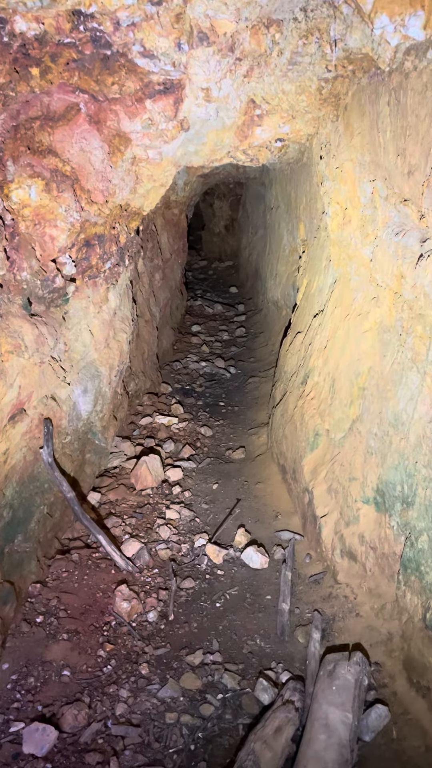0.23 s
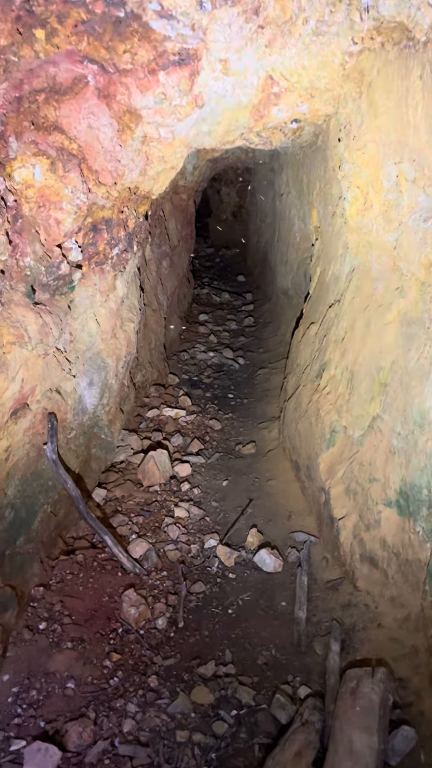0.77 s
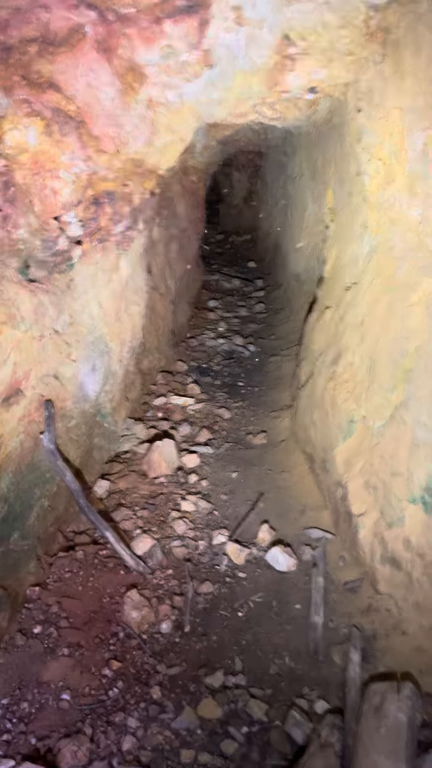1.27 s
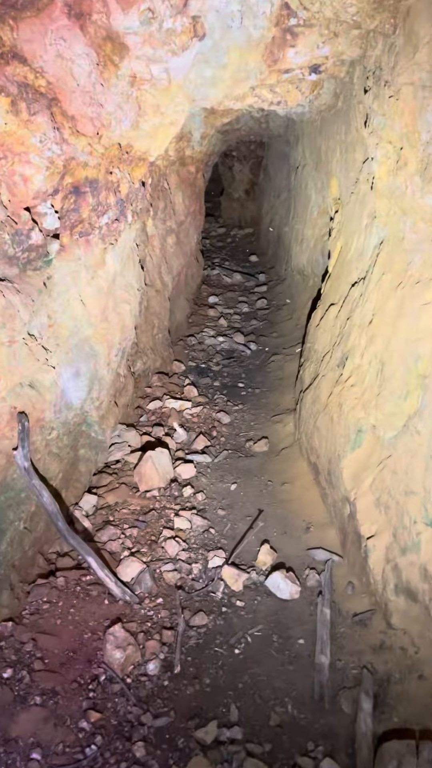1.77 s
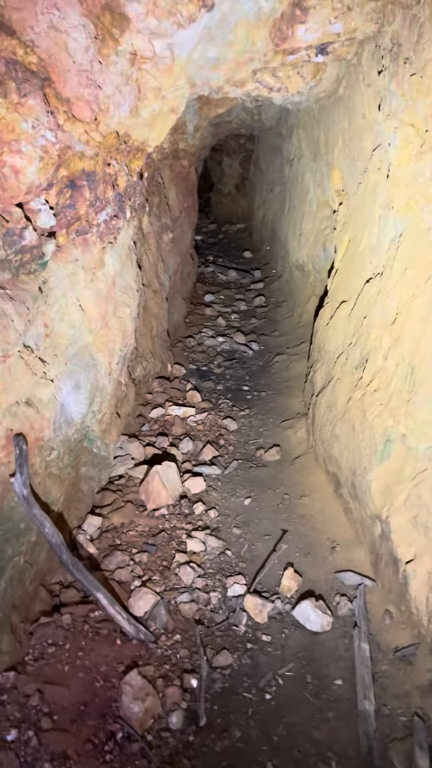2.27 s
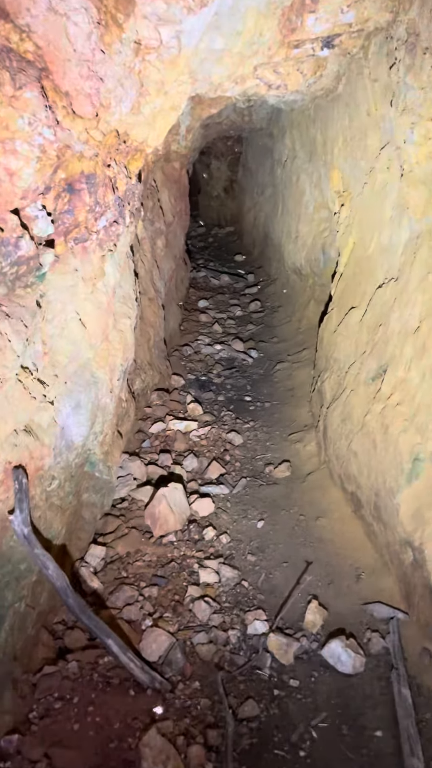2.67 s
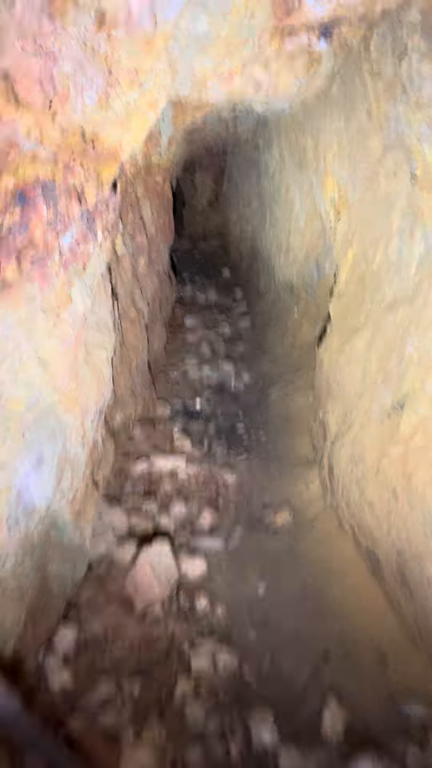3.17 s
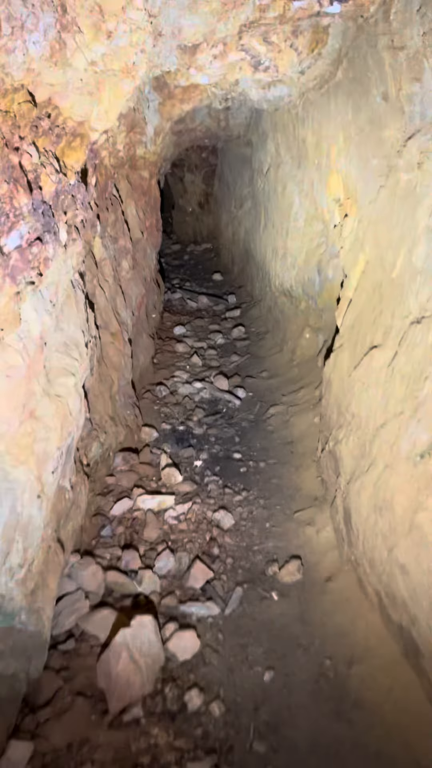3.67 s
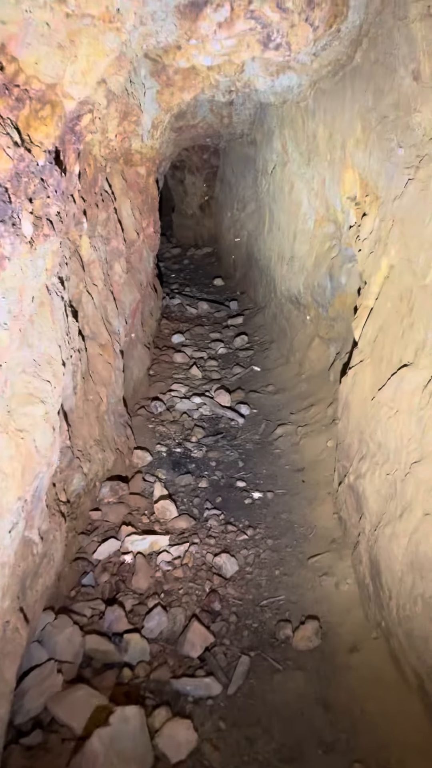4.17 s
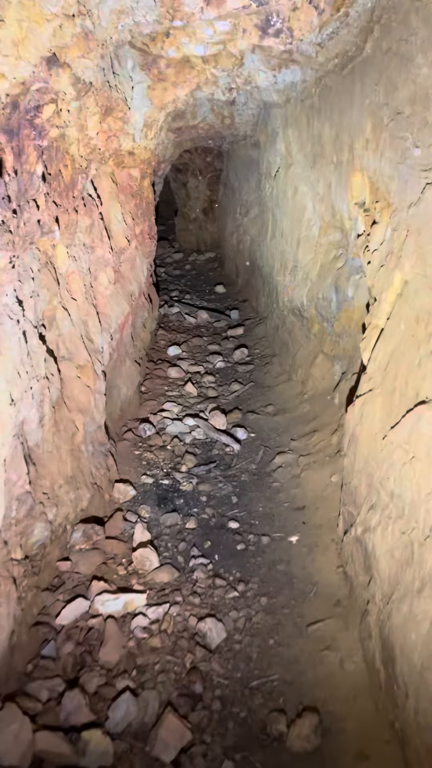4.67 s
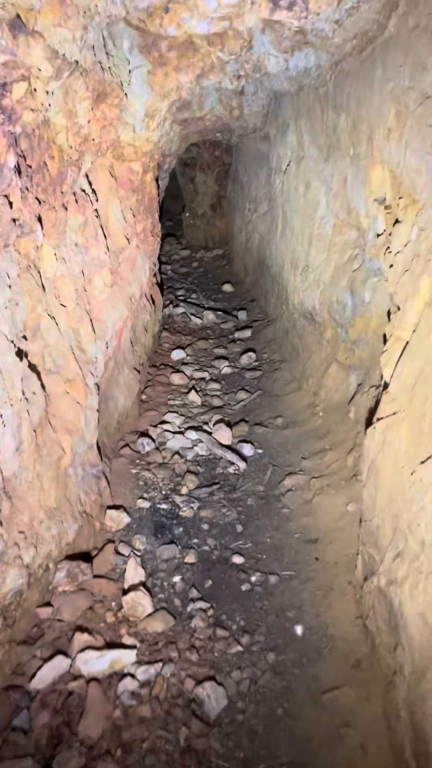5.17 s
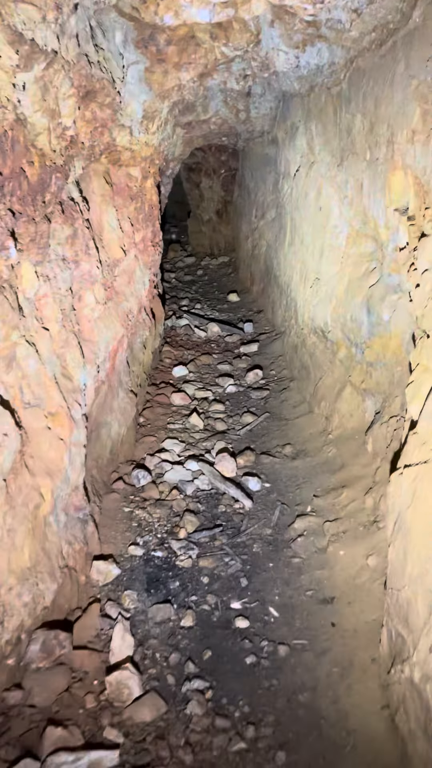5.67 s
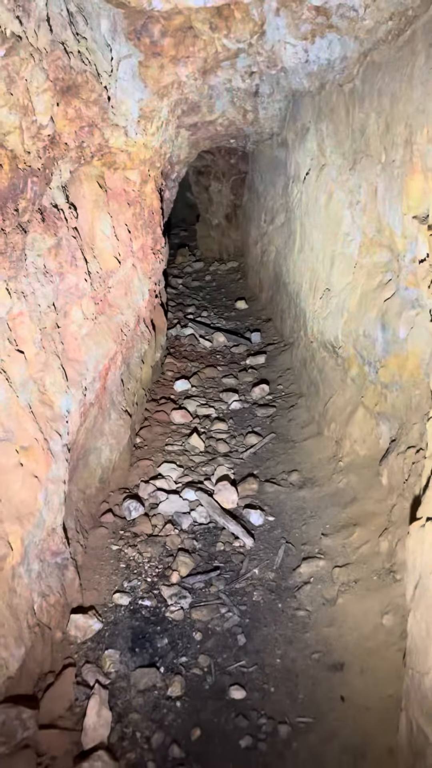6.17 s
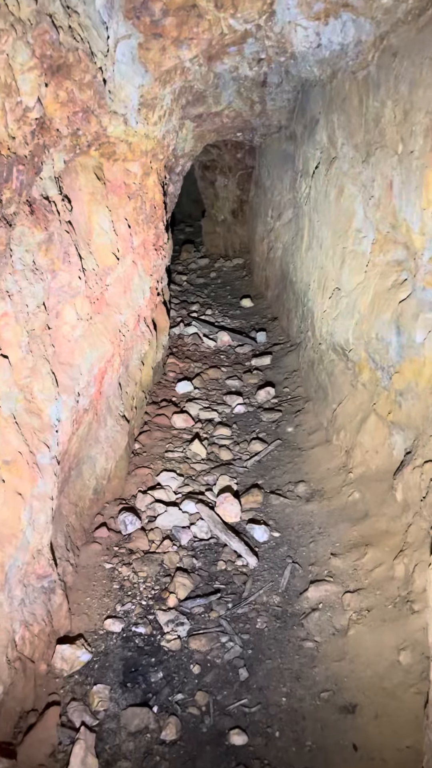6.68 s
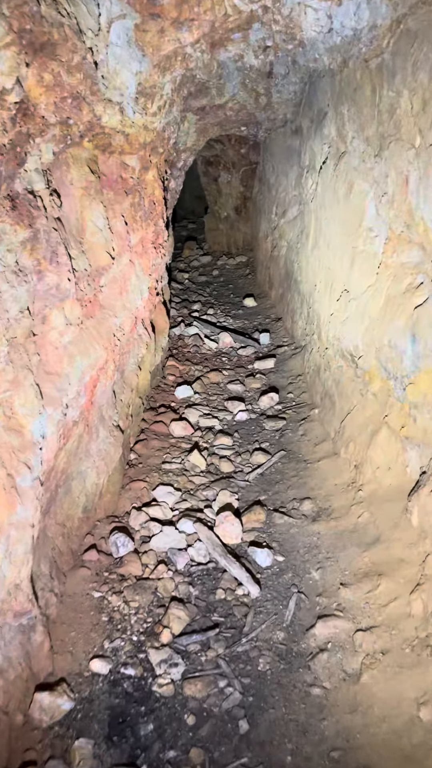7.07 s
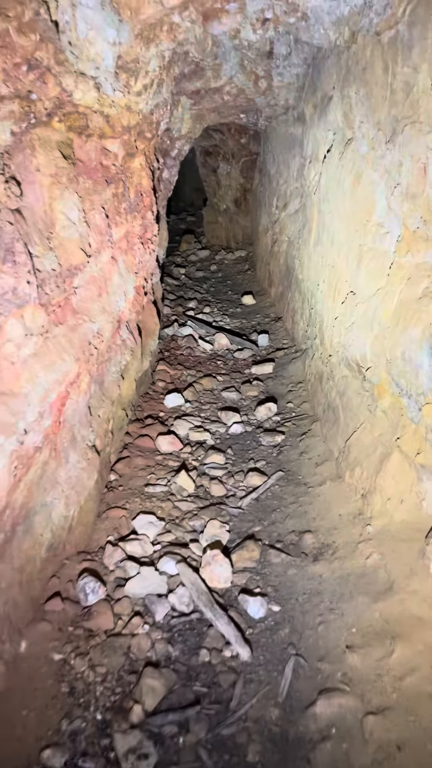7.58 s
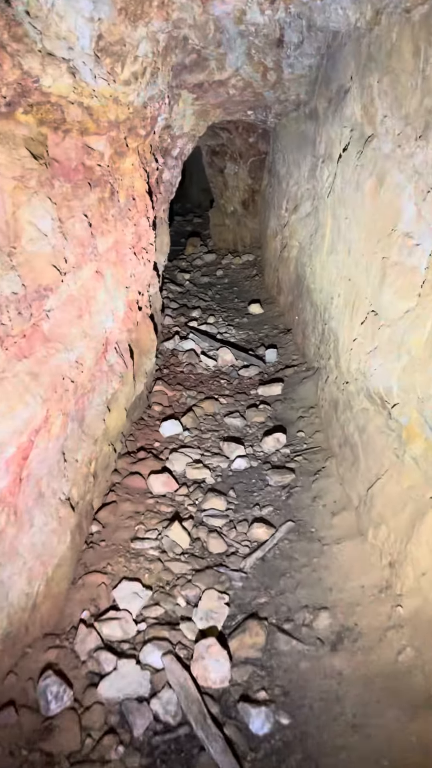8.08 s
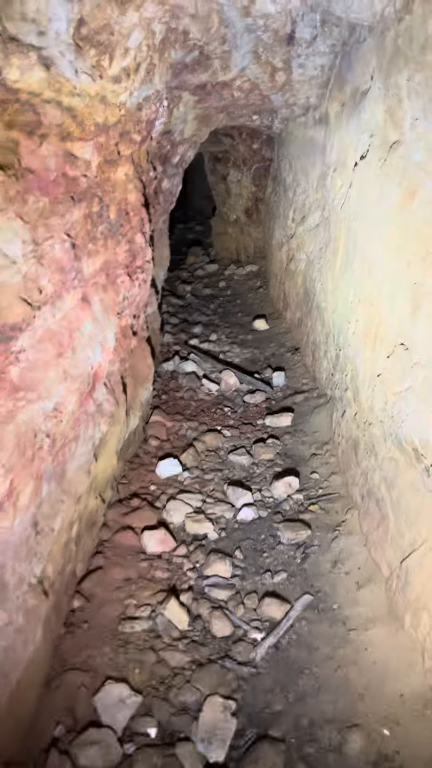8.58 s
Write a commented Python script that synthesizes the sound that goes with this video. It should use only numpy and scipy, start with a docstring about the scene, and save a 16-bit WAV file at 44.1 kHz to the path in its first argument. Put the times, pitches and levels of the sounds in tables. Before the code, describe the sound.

Someone walks slowly over rubble underground, soles scuffing grit, rocks tipping and cracking, close walls adding short boomy echoes over faint hush.

```python
"""A narrow tunnel floored with loose rock: someone walks through it with uneven steps, close to a two-port microphone.
Each boot is a burst of noise tuned to a thud, with a harder slap and an 82 Hz thump; scuffs are clouds of tiny rings.
Big rocks clunk on one low note and a weak overtone, small stones crack and ring in two modes, hollow echoes sink in pitch.
Random echoes from close walls thicken each contact, and low resonances boom over rumble and a faint steady hush."""
import sys
import numpy as np
from scipy import signal
from scipy.fft import rfft, irfft, next_fast_len
from scipy.io import wavfile
from scipy.ndimage import uniform_filter1d

SR = 44100
rng = np.random.default_rng(int(sys.argv[2]) if len(sys.argv) > 2 else 0)


def digitize_waveform(pressure):
    """Quantize a signal to 16-bit integers and store it at the path in sys.argv[1].

    Rows of a 2-D input are taken as channels; values are limited to [-1, 1].
    """
    field = np.atleast_2d(pressure).T
    bounded = np.clip(field, -1, 1)
    quanta = np.round(bounded * 32767).astype(np.int16)
    wavfile.write(sys.argv[1], SR, quanta)


N = 389844

# boots landing and taking weight; thump and slap are set relative to the level of the landing:
# start_s, level_db, thump_db, slap_db, pitch_hz
LANDINGS = [(0.376, -41, -13, -18, 270), (0.571, -43.5, -16, -2, 336), (0.664, -40, -3, -8, 310),
            (1.118, -39, 4.5, -22, 260), (1.142, -38, -10, -3, 480), (1.204, -26.5, -8, -8, 271.6),
            (1.227, -28, -8, -13, 200), (1.293, -39, -3, -6, 480), (1.504, -38, -1, -30, 257),
            (1.948, -47.5, 9, 0, 273), (1.973, -42, 4, -16, 230), (2.194, -48, -17, 0, 345),
            (2.512, -47, -3, -22, 260), (3.063, -32, -22, -5, 320), (3.094, -26, -9, -7, 230),
            (3.117, -26.5, -2.5, -14, 219), (3.232, -40, 3, -16, 140), (3.698, -39, -2, -17, 383),
            (3.762, -22, -13, -1.5, 382), (4.284, -44, -19, 4, 407), (4.377, -40, -1, -18, 260),
            (4.496, -39, -16, -6.5, 383), (4.84, -42, -6, -8, 322), (4.909, -35, -6, -6, 286),
            (4.939, -32, -6, -14, 312), (5.151, -32, -10, -2, 310), (5.443, -42.5, -6, -0.5, 288),
            (5.702, -31.5, -1, -3, 455), (5.774, -36, 3, -24, 175), (6.235, -42, 2, -5, 318),
            (6.865, -45, -7, -16, 280), (6.922, -44, -12, -18, 270), (7.519, -38.5, 8.5, 1.5, 438),
            (7.628, -39, 5, -15, 290), (8.23, -38, 0, -12, 300), (8.31, -42, -11, -6, 272),
            (8.369, -40, -8, -20, 275)]
# treble of cracking stone edges and breaking chips: frequency_hz, gain_db
EDGE_SPECTRUM = [(3000, -40), (5500, -6), (7000, 1), (8800, 7.5), (10300, 2), (12500, 1), (15500, -17)]


def amp(db):
    """Decibels to gain."""
    return 10 ** (np.asarray(db) / 20)


def unit(x):
    """x at rms 1."""
    return x / np.sqrt(np.mean(x ** 2) + 1e-20)


def crest(pair):
    """A mid-side pair scaled so that the loudest 5 ms of its mid have rms 1."""
    return pair / np.sqrt(uniform_filter1d(pair[0] ** 2, size=220).max())


def along(points, hz):
    """Values at hz from (frequency, value) points, interpolated on a log axis."""
    f, v = np.transpose(points)
    return np.interp(np.log(hz + 1), np.log(f + 1), v)


def curve(points):
    """One value per sample from (time, value) points."""
    s, value = np.transpose(points)
    return np.interp(np.arange(N) / SR, s, value)


def filtered(x, response):
    """x times a complex response of frequency."""
    n = x.shape[-1]
    padded = next_fast_len(n + SR // 4)
    return irfft(rfft(x, padded) * response(np.fft.rfftfreq(padded, 1 / SR)), padded)[..., :n]


def coloured(x, spectrum, size=4096):
    """x through a causal minimum-phase filter with the given spectrum."""
    gain = amp(along(spectrum, np.fft.rfftfreq(size, 1 / SR)))
    cepstrum = irfft(np.log(gain))
    # folding the cepstrum forward in time makes the phase minimal
    cepstrum[1:size // 2] *= 2
    cepstrum[size // 2:] = 0
    kernel = irfft(np.exp(rfft(cepstrum)))
    kernel = kernel.reshape((1,) * (x.ndim - 1) + (size,))
    return signal.fftconvolve(x, kernel, axes=-1)[..., :x.shape[-1]]


def focused(x, hz, width, skirt_db):
    """x with a broad resonance at hz that falls to the skirt level within the relative width."""
    return coloured(x, [(hz / (1 + width), skirt_db), (hz, 0), (hz * (1 + width), skirt_db)])


def swells(events, size=44):
    """Gain per sample of overlapping (s, dB, rise s, fall s) swells; rise and fall each span 20 dB."""
    t = np.arange(0, N, size) / SR
    power = 0
    for s, db, rise, fall in events:
        slope = np.minimum((t - s) / rise, (s - t) / fall)
        power = power + amp(db + 20 * slope) ** 2
    return np.interp(np.arange(N) / SR, t, np.sqrt(power))


def add(track, s, sound):
    """Mix a sound into the track from time s on."""
    start = max(0, round(s * SR))
    part = sound[:, :max(0, N - start)]
    track[:, start:start + part.shape[1]] += part


def walls(sound, direct, near_t60, far_t60, far_db):
    """Mid and side of one spot: direct path in the middle, a rush of close-wall echoes, the tail down the tunnel."""
    t = np.arange(SR // 2) / SR
    decay = amp(-60 * t / near_t60) + amp(far_db - 60 * t / far_t60)
    echoes = rng.standard_normal((2, len(t))) * decay / np.linalg.norm(decay)
    echoes[0, 0] = direct
    return signal.oaconvolve(sound[None], echoes, axes=1)


def along_the_way(x, direct, near_t60, far_t60, far_db, size=4410):
    """Each tenth of a second gets wall echoes of its own, as the patch of ground shifts."""
    out = np.zeros((2, N))
    for start in range(0, N, size):
        patch = x[start:start + size]
        add(out, start / SR, walls(patch, direct, near_t60, far_t60, far_db))
    return out


def grains(rate, low_hz, high_hz, cycles, spread_db, size):
    """Tiny contacts at random, rate per second, each a ring of its own pitch and strength that decays over a few cycles."""
    when, pitch, strength = rng.random((int(rate * N / SR), 3)).T
    hz = low_hz * (high_hz / low_hz) ** pitch
    gain = hz * amp(-spread_db * np.log(np.maximum(strength, 1 / 100)))
    turns = hz[:, None] * np.arange(size) / SR
    rings = gain[:, None] * np.sin(2 * np.pi * turns) * np.exp(-turns / cycles)
    index = (when * N).astype(int)[:, None] + np.arange(size)
    return np.bincount(index.ravel(), rings.ravel(), N)[:N]


def boom():
    """Gain of the low rumble: a slow background level, plus a swell that peaks just after each thump and rolls away."""
    # background rumble: time_s, level_db
    background = [(0, -72), (0.4, -62.5), (2.9, -59), (4.1, -52), (4.7, -60.5), (5.4, -53), (6.6, -59.5),
                  (7, -51.5), (8.84, -52.5)]
    linger_db, rise_s, fall_s = -17.5, .15, .7  # level relative to the thump
    after = swells([(s + rise_s, db + thump_db + linger_db, rise_s, fall_s)
                    for s, db, thump_db, *_ in LANDINGS])
    return np.hypot(after, amp(curve(background)))


def tunnel_air(boom_db=-4, floor_db=-68):
    """Low rumble, shaped noise, rolls along the tunnel around the steps over a faint steady hush."""
    # low rumble: frequency_hz, gain_db
    rumble_spectrum = [(25, -32), (45, 1), (65, -4.5), (90, -11.5), (130, -7.5), (200, -23.5), (500, -71.5)]
    # hush of the air: frequency_hz, gain_db
    hush_spectrum = [(20, -11.5), (55, 7.5), (150, -12.5), (350, -7), (700, -16.5), (2000, -24),
                     (5000, -31.5), (10000, -35.5), (15000, -44)]
    rumble = unit(coloured(rng.standard_normal((2, N)), rumble_spectrum))
    hush = unit(coloured(rng.standard_normal((2, N)), hush_spectrum))
    return amp(boom_db) * boom() * rumble + amp(floor_db) * hush


def sinking_echoes(rough=.5, size=700):
    """The tunnel returns higher notes sooner than low ones, so its uneven answer slides down in pitch."""
    # hollow echoes after a landing: start_s, level_db
    answers = [(7.535, -46.5), (7.63, -43), (8.24, -50), (8.45, -52.5)]
    start_hz, end_hz, sink_s, rise_s, t60_s = 495, 295, .065, .015, .45  # sink and rise are time constants
    out, t = np.zeros((2, N)), np.arange(SR // 2) / SR
    hz = end_hz + (start_hz - end_hz) * np.exp(-t / sink_s)
    phase = 2 * np.pi * np.cumsum(hz) / SR
    swell = (1 - np.exp(-t / rise_s)) * amp(-60 * t / t60_s)
    for s, db in answers:
        # slow random drift of both quadratures makes the note uneven
        drift = uniform_filter1d(rng.standard_normal((2, len(t))), size=size)
        a, b = rough * unit(drift)
        tone = swell * ((1 + a) * np.sin(phase) + b * np.cos(phase))
        echo = walls(tone, direct=1.5, near_t60=.08, far_t60=.3, far_db=-14)
        add(out, s, amp(db) * crest(echo))
    return out


def stones(body_db=-5, edge_db=-3, crack_t60=0.0086, grinding=0.52, seating=.05, dulling=.35):
    """Stones ring briefly in two modes; sharp edges crack at once, blunt faces seat slowly, grind longer, sound duller."""
    # stones knocking together; edge is the treble relative to the level, ring is how far the pitch stands out:
    # start_s, level_db, edge_db, pitch_hz, ring_db
    knocks = [(0.2805, -44, -19, 1480, 12), (0.3696, -50, -24, 1630, 10), (0.5645, -42, -35, 2900, 8),
              (0.617, -54, -3, 2900, 4), (1.015, -48.5, -20, 1020, 11), (1.066, -49.5, -24, 1300, 7),
              (1.0894, -45, -20, 1300, 13), (1.164, -47, -16, 2300, 3), (1.2005, -33.5, -28, 2730, 6),
              (1.227, -43, -28, 2900, 7), (2.4623, -47, -32, 3600, 3), (3.061, -47, -24, 1900, 4),
              (3.086, -42, -25, 2080, 4), (3.101, -37, -24, 1050, 10), (3.1176, -42.5, 3, 1920, 4),
              (3.7215, -39.5, -14, 2400, 6), (3.7588, -29, -3, 2100, 6), (3.762, -23.5, 4.5, 2000, 2),
              (4.2805, -46, -24, 1100, 8), (4.3826, -44.5, -10, 2330, 5), (4.4934, -41, -17, 1950, 11),
              (4.5135, -41, -18, 1500, 6), (4.531, -44, -17, 1900, 6), (4.833, -41, -31, 2250, 8),
              (4.9048, -41, -21, 2000, 2), (4.922, -39.5, -2, 2100, 3), (4.9605, -35.5, -9, 5000, 6),
              (4.969, -39, -10, 2600, 5), (5.134, -41, -20, 2000, 8), (5.147, -32.5, 0, 2350, 5),
              (5.193, -43, -8, 2300, 5), (5.2724, -36, -8, 4500, 10), (5.275, -40, -20, 2500, 13),
              (5.3277, -43.5, -1, 2670, 5), (5.456, -44, -13, 2900, 6), (5.5146, -48, -12, 4100, 4),
              (5.572, -42, -6, 2250, 17), (5.586, -45, -13, 1980, 17), (5.7, -43, -22, 2130, 5),
              (5.731, -46, -24, 2450, 10), (6.2342, -52.5, -21, 1870, 6), (6.865, -55, -36, 1600, 9),
              (7.04, -52.5, -22, 1300, 7), (7.5196, -47.5, -19, 1620, 7), (7.5956, -50, -6, 5040, 7),
              (7.6264, -40, -26, 2550, 7), (8.3089, -46.5, -24, 1250, 5), (8.3865, -46.5, -24, 2300, 8),
              (8.402, -46.5, -26, 2650, 9), (8.5162, -51.5, -22, 1100, 7), (8.5626, -54, -26.5, 4130, 8)]
    # body of a struck stone: frequency_hz, gain_db
    stone_spectrum = [(400, -25), (1000, 3.5), (2200, 2.5), (3500, 0.5), (5500, 0), (7500, -3.5),
                      (10000, -12), (15000, -34)]
    overtone_ratio, overtone_share = 2.4, .3  # second mode: pitch over the first, share of its prominence
    out, t = np.zeros((2, N)), np.arange(SR // 25) / SR
    for s, db, bright_db, hz, ring_db in knocks:
        contact_t60 = crack_t60 * amp(-grinding * bright_db)
        onset = 1 - np.exp(-t / (seating * contact_t60))
        crack = rng.standard_normal(len(t)) * amp(-60 * t / contact_t60) * onset
        ring = focused(coloured(crack, stone_spectrum), hz, width=.4, skirt_db=-ring_db)
        ring = focused(ring, overtone_ratio * hz, width=.18, skirt_db=-overtone_share * ring_db)
        ring = coloured(ring, [(1.3 * hz, 0), (3 * hz, dulling * bright_db)])
        body = walls(ring, direct=0.62, near_t60=0.1, far_t60=0.33, far_db=-9)
        treble = coloured(crack, EDGE_SPECTRUM)
        edge = walls(treble, direct=.5, near_t60=.05, far_t60=0.16, far_db=-10)
        add(out, s, amp(db + body_db) * crest(body) + amp(db + bright_db + edge_db) * crest(edge))
    return out


def rocks(direct=1.1, near_t60=.1, far_t60=.45, far_db=-13):
    """A big loose rock tips and clunks on its bed: one low, round note with a weak overtone that dies sooner."""
    # tipping rocks: start_s, level_db, pitch_hz, t60_s
    clunks = [(1.173, -36, 265, .06), (1.205, -22, 270, .035), (1.251, -30.5, 277, .13),
              (3.065, -29, 340, .07), (3.098, -26, 350, .03), (3.1155, -22, 215, .045),
              (3.131, -31, 138, .1), (3.697, -33.5, 383, .12), (3.7725, -25.5, 320, .03),
              (3.812, -30, 400, .07), (4.379, -41.5, 300, .07), (4.842, -38.5, 380, .11),
              (4.91, -38, 265, .06), (4.941, -29.5, 275, .03), (4.991, -37, 305, .06),
              (5.146, -35, 640, .04), (5.1495, -27.5, 330, .05), (5.586, -47, 350, .1),
              (5.7025, -33, 450, .045), (5.706, -31.5, 180, .05), (6.238, -45, 335, .11),
              (7.626, -37, 295, .06), (8.23, -41, 380, .09), (8.311, -39, 275, .04), (8.372, -39, 262, .07)]
    rise_s, overtone_ratio, overtone_db = .003, 2.07, -14
    out, t = np.zeros((2, N)), np.arange(SR // 5) / SR
    for s, db, hz, t60 in clunks:
        fade, phase = amp(-60 * t / t60), 2 * np.pi * hz * t
        note = np.sin(phase) + amp(overtone_db) * fade * np.sin(overtone_ratio * phase)
        clunk = note * fade * (1 - np.exp(-t / rise_s))
        add(out, s, amp(db) * crest(walls(clunk, direct, near_t60, far_t60, far_db)))
    return out


def tread():
    """Low-mid, grit and sand levels in dB: scuffs build and settle, landings shove rubble, over a hush and light stirring."""
    # soles scuffing through loose ground, rise and fall each over 20 dB:
    # hardest_push_s, rubble_db, grit_db, sand_db, rise_s, fall_s
    scuffs = [(0.33, -45, -54, -54.5, .14, .13), (0.68, -42, -51.5, -48, 0.17, 0.17),
              (1.095, -41, -46.5, -48.5, 0.13, 0.06), (1.2, -34, -42, -41, 0.11, 0.11),
              (1.265, -37, -58, -62, .03, .14), (1.52, -52.5, -64, -57, 0.22, 0.14),
              (1.77, -52, -56, -55, 0.08, 0.1), (2.008, -38.5, -51.5, -54, .06, .09),
              (2.205, -44.5, -61.5, -72, .07, .11), (2.475, -45, -52, -49, .06, 0.075),
              (2.66, -57, -59.5, -59.5, .07, .1), (2.85, -58, -60, -59.5, .04, .14),
              (3.01, -53, -54.5, -57.5, 0.22, .08), (3.104, -28, -42.5, -42.5, 0.0523, 0.1247),
              (3.728, -26, -42, -41, 0.045, 0.07), (3.768, -20.5, -33, -31.5, 0.014, .04),
              (3.815, -24, -40, -42, 0.0534, 0.125), (4.295, -38, -52.5, -53, .018, .1),
              (4.495, -39, -47.5, -50, 0.24, .13), (4.849, -33, -48, -48.5, 0.02, 0.07),
              (4.942, -35, -45, -38.5, .048, .12), (5.15, -31, -43, -40, 0.04, .14),
              (5.285, -45, -53, -52, .05, .15), (5.462, -38.5, -49, -48.5, .04, .11),
              (5.59, -44.5, -51.5, -51.5, .03, 0.11), (5.715, -33, -52, -51, .01, 0.21),
              (5.86, -47, -56, -52, 0.14, 0.11), (6.25, -46, -59.5, -58.5, 0.1, 0.07),
              (6.91, -50, -62, -68, 0.2, 0.1), (7.05, -48, -62.5, -66, 0.05, 0.17),
              (7.265, -49.5, -52, -55, 0.09, 0.09), (7.445, -54, -61, -63, .04, .1),
              (7.635, -38, -53.5, -57, 0.16, .2), (7.73, -39.5, -58, -57, .04, .14),
              (8.25, -40.5, -54.5, -58, 0.07, 0.13), (8.335, -44, -54, -57, .04, .08),
              (8.395, -40.5, -54, -57.5, 0.05, .19)]
    # grit stirring lightly underfoot between the scuffs: time_s, level_db
    stirring = [(0, -83.5), (0.25, -70), (1, -66.5), (1.65, -68.5), (2.25, -68), (2.4, -64), (2.75, -74),
                (3.3, -65.5), (3.6, -68.5), (4.05, -58.5), (4.75, -81), (5.1, -60), (5.7, -62.5),
                (6.1, -72), (6.45, -74), (6.85, -67), (7.35, -69.5), (7.85, -62.5), (8.68, -64.5),
                (8.84, -85)]
    shove_db, shove_rise_s, shove_fall_s = -14.5, .02, 0.11  # level relative to the landing
    stir_sand_db = -2.5  # relative to the stirring grit
    hush_mean_db, hush_follows = -55.5, 0.43  # low-mid hush of the tunnel: mean level, dB per dB of grit

    shoves = [(s + shove_rise_s, db + shove_db, shove_rise_s, shove_fall_s) for s, db, *_ in LANDINGS]
    roll = swells([(s, db, rise, fall) for s, db, _, _, rise, fall in scuffs] + shoves)
    grind = swells([(s, db, rise, fall) for s, _, db, _, rise, fall in scuffs])
    grate = swells([(s, db, rise, fall) for s, _, _, db, rise, fall in scuffs])
    stir_db = curve(stirring)
    low_mid_hush_db = hush_mean_db + hush_follows * (stir_db - stir_db.mean())
    low_mid = np.hypot(roll, amp(low_mid_hush_db))
    grind = np.hypot(grind, amp(stir_db))
    grate = np.hypot(grate, amp(stir_db + stir_sand_db))
    return 20 * np.log10([low_mid, grind, grate])


def crunch(rubble_db=-7, grit_db=-5.5, sand_db=-7, sparkle_db=-6.5, brightening=0.26):
    """Rubble rolls dully over a low-mid hush, grit cracks and sand grates; harder grating brings up brighter chips."""
    # rolling rubble and low-mid hush: frequency_hz, gain_db
    rubble_spectrum = [(80, -20), (140, -12), (280, -1.5), (390, -3.5), (550, -10), (750, -12), (1100, -18),
                       (1900, -27.5), (4000, -63)]
    # cracking grit: frequency_hz, gain_db
    grit_spectrum = [(450, -25), (800, -1.5), (2200, 2), (3300, -8), (5200, -20), (10000, -35)]
    # grating sand: frequency_hz, gain_db
    sand_spectrum = [(1200, -28), (2800, -4.5), (3800, -3.5), (5200, -3), (7000, -9), (10000, -18),
                     (12500, -12.5), (15500, -27)]
    low_mid_db, grind_db, grate_db = tread()
    # the same dull grains serve the rolling rubble and the low-mid hush
    dull = grains(rate=700, low_hz=146.6, high_hz=2040, cycles=1.37, spread_db=1.7, size=400)
    dull = unit(coloured(dull, rubble_spectrum))
    grit = grains(rate=800, low_hz=649, high_hz=4500, cycles=1.6, spread_db=1.9, size=240)
    grit = unit(coloured(grit, grit_spectrum))
    sand = grains(rate=900, low_hz=2200, high_hz=15000, cycles=1.6, spread_db=2.0, size=100)
    sand = unit(coloured(sand, sand_spectrum))
    chips = grains(rate=290, low_hz=5000, high_hz=14000, cycles=2, spread_db=1.5, size=48)
    chips = unit(coloured(chips, EDGE_SPECTRUM))
    hardness_db = brightening * (grate_db - grate_db.max())
    fine = amp(grate_db) * (amp(sand_db) * sand + amp(sparkle_db + hardness_db) * chips)
    coarse = amp(low_mid_db + rubble_db) * dull + amp(grind_db + grit_db) * grit
    return along_the_way(coarse + fine, direct=0.16, near_t60=0.089, far_t60=.45, far_db=-14.5)


def footfalls(thud_db=-3, slap_db=-6, thump_db=-4, settle_t60=0.013, slap_t60=0.024, push_s=0.0076):
    """A boot thuds on packed rubble and slaps on bare rock; its weight pushes a low thump into the tunnel."""
    # thud of the boot: frequency_hz, gain_db
    sole_spectrum = [(70, -17), (130, -5), (175, -0.5), (280, -1), (385, -2.5), (500, -7), (800, -23.5),
                     (1800, -52.5)]
    # slap on bare rock: frequency_hz, gain_db
    slap_spectrum = [(250, -40.5), (450, -13), (650, 4.5), (850, 3), (1300, -22.5), (2200, -20),
                     (5000, -68)]
    out, t = np.zeros((2, N)), np.arange(SR // 14) / SR
    push = t * np.exp(-t / push_s) * np.cos(2 * np.pi * 82 * t)
    for s, db, low_db, hard_db, hz in LANDINGS:
        heel, sole = rng.standard_normal((2, len(t)))
        contact = coloured(heel * amp(-60 * t / settle_t60), sole_spectrum)
        contact = focused(contact, hz, width=0.26, skirt_db=-11.0)
        thud = walls(contact, direct=0.65, near_t60=.12, far_t60=0.62, far_db=-10.5)
        smack = coloured(sole * amp(-60 * t / slap_t60), slap_spectrum)
        slap = walls(smack, direct=0.18, near_t60=.08, far_t60=.5, far_db=-5)
        thump = walls(push, direct=0.67, near_t60=0.17, far_t60=1.18, far_db=-5.0)
        blow = amp(thud_db) * crest(thud)
        blow = blow + amp(hard_db + slap_db) * crest(slap)
        blow = blow + amp(low_db + thump_db) * crest(thump)
        add(out, s, amp(db) * blow)
    return out


def resonances(f):
    """Standing waves between walls, floor and roof lift a few low notes."""
    # cross resonances added to the plain sound: frequency_hz, width_hz, gain_db
    modes = [(89, 19.7, 6.5), (160.6, 15, 1.5), (239, 2.7, -7), (275.2, 7.4, -7), (358.7, 5.7, -1.5),
             (667, 12, -16)]
    response = 1
    for hz, width, db in modes:
        response = response + amp(db) * 1j * f * width / (hz * hz - f * f + 1j * f * width)
    return response


def scene():
    """All sounds ring in the tunnel, then middle and side are coloured and spread to left and right."""
    # colour of the middle signal, a deep notch near 7.6 kHz and a falling top: frequency_hz, gain_db
    mid_spectrum = [(5800, -1), (6800, -6.5), (7600, -35), (8800, -7), (10500, 1.5), (12700, -5.5),
                    (14000, -19)]
    # colour of the side signal: frequency_hz, gain_db
    side_spectrum = [(60, -37), (200, -20.5), (380, -13.5), (700, 0.5), (1200, 1), (2400, -0.5),
                     (5500, -3.5), (8500, 1), (9600, -6.5), (11000, -14.5), (13000, -2)]
    # share of the middle signal that favours the left: frequency_hz, gain_db
    lean_spectrum = [(100, -28.5), (250, -23.5), (600, -7.5), (1200, -11), (2500, -23.5), (4500, -39.5)]
    layers = tunnel_air() + sinking_echoes() + stones() + rocks() + crunch() + footfalls()
    centre, spread = filtered(layers, resonances)
    mid = coloured(centre, mid_spectrum)
    side = coloured(spread, side_spectrum) + coloured(centre, lean_spectrum)
    return np.array([mid + side, mid - side])


def record(dry):
    """The microphone chain rolls off below 32 Hz and cuts steeply above 15.8 kHz."""
    highpass = signal.butter(2, 32, "highpass", fs=SR, output="sos")
    highpassed = signal.sosfilt(highpass, dry)
    return filtered(highpassed, lambda hz: 1 / np.sqrt(1 + (hz / 15800) ** 160))


dry = scene()
out = record(dry)
digitize_waveform(out)
```